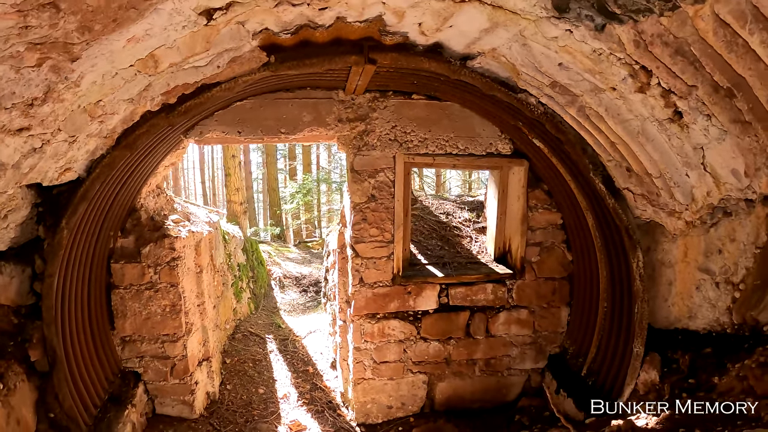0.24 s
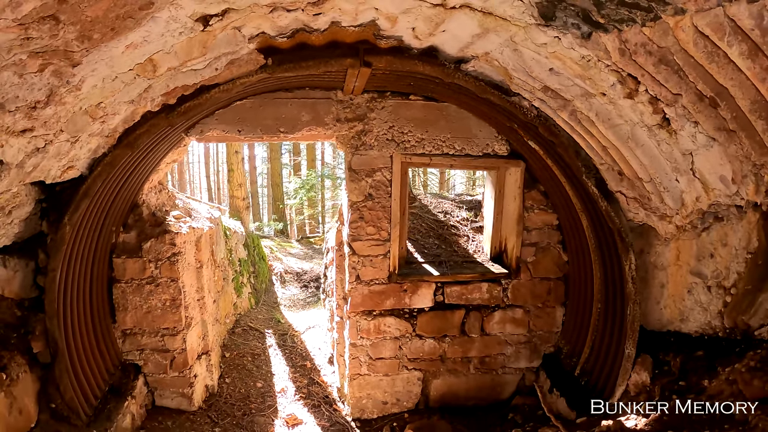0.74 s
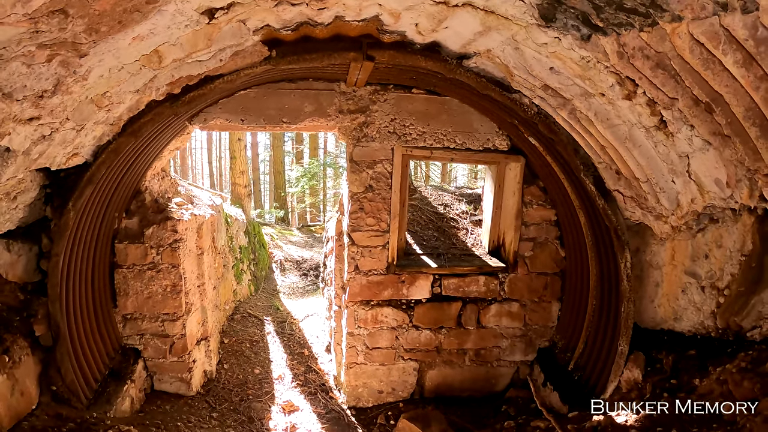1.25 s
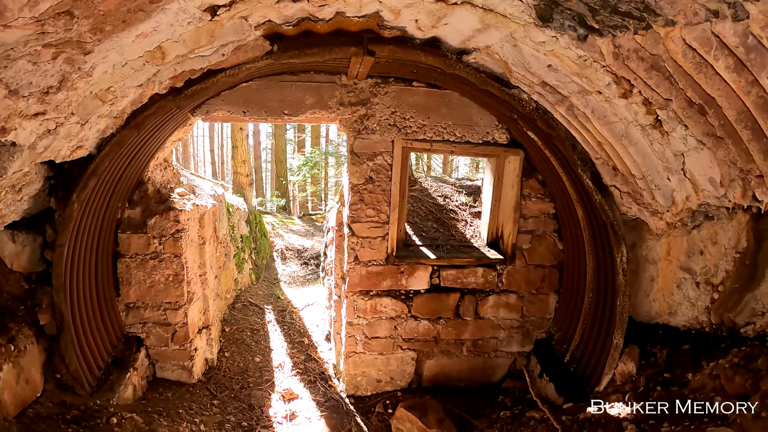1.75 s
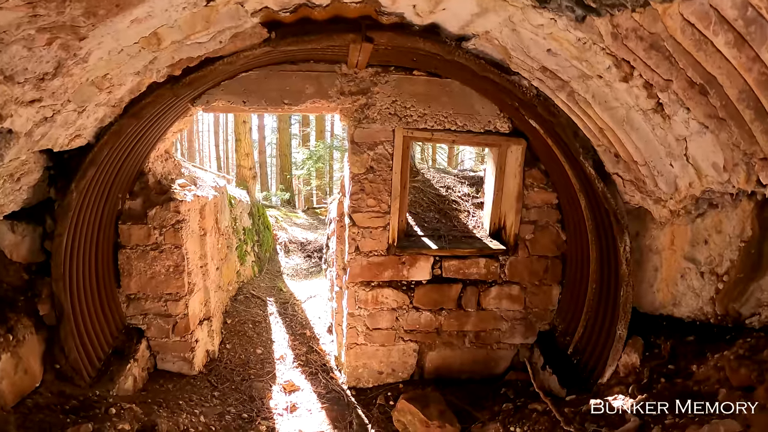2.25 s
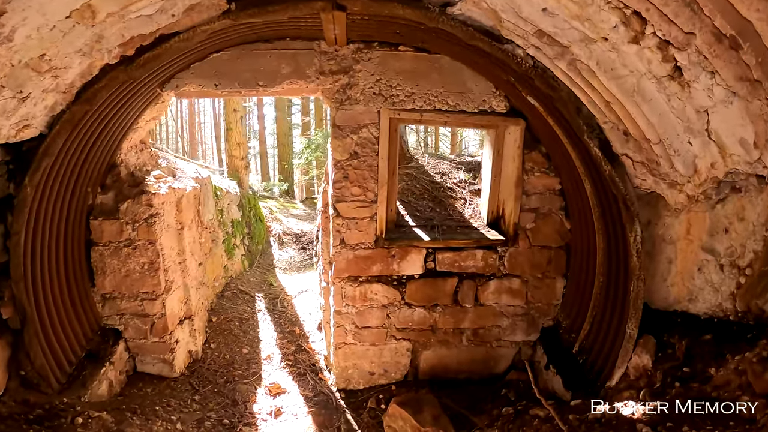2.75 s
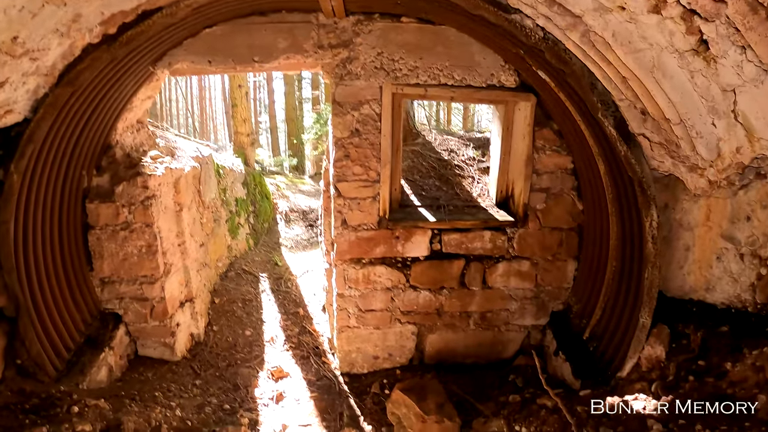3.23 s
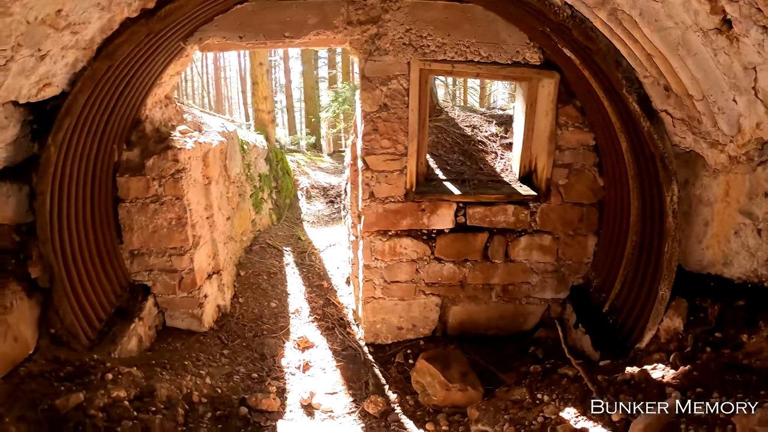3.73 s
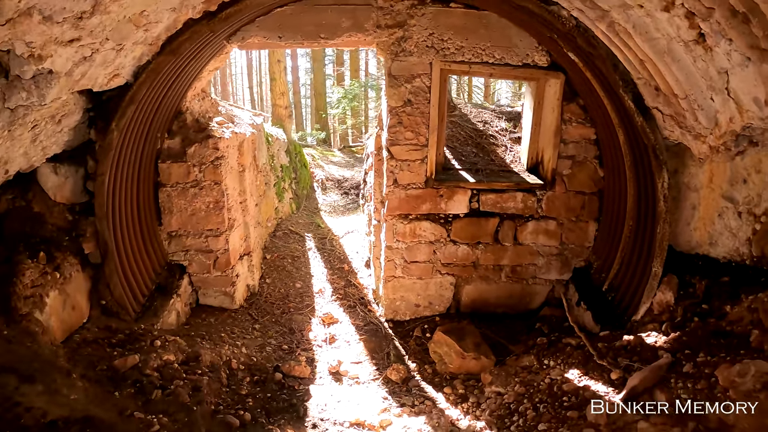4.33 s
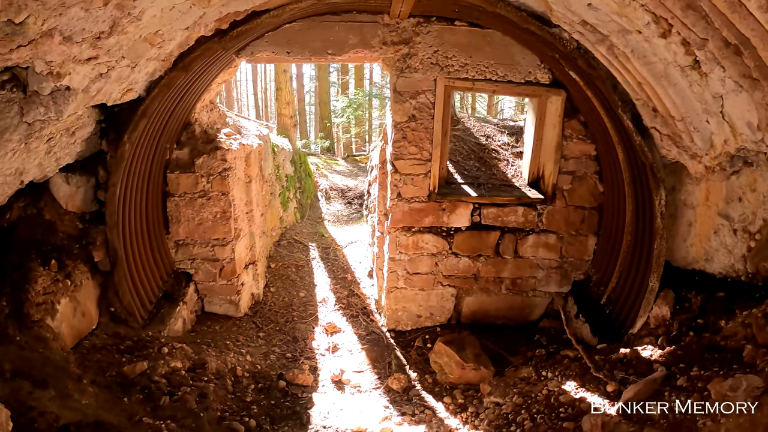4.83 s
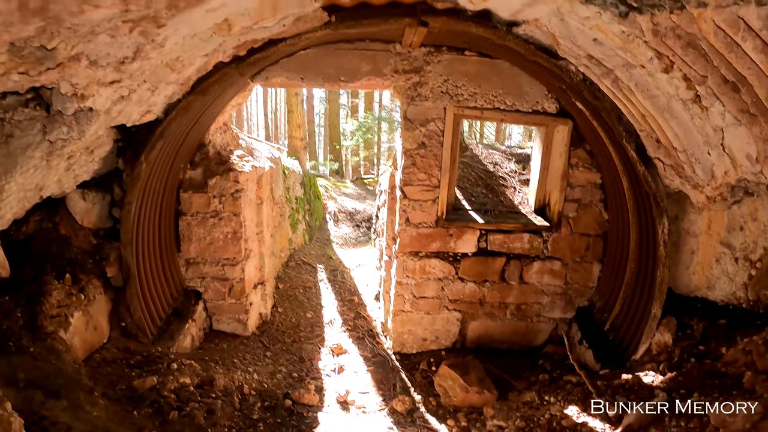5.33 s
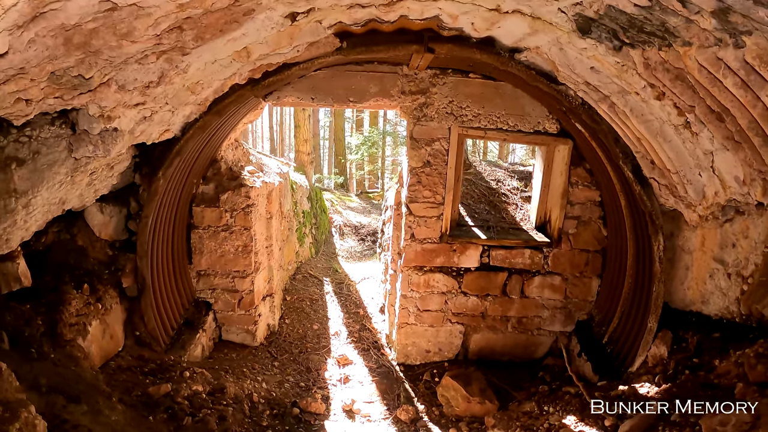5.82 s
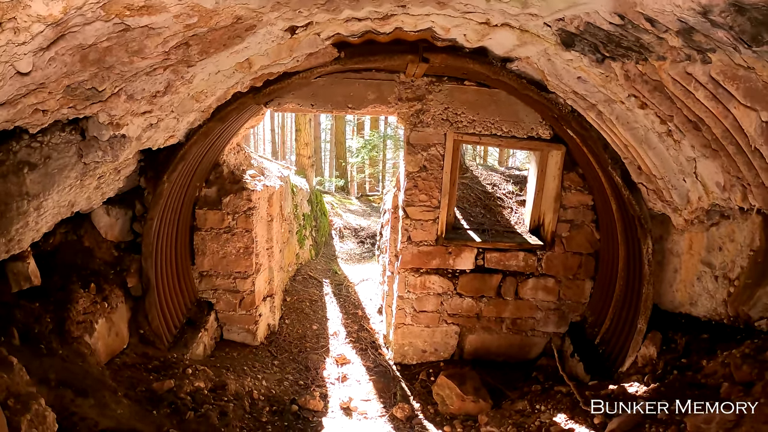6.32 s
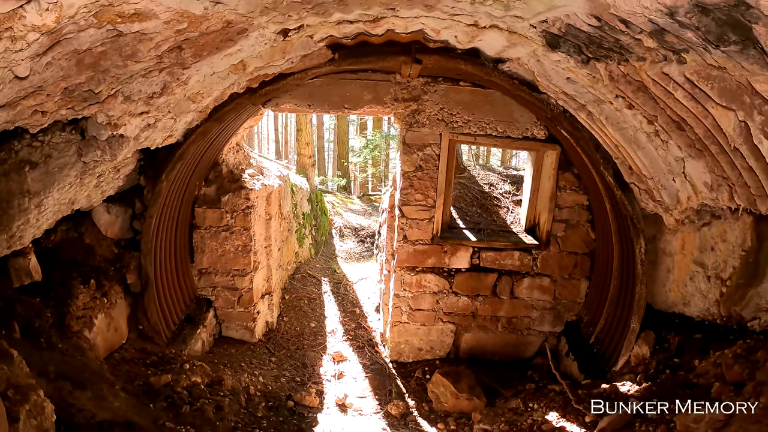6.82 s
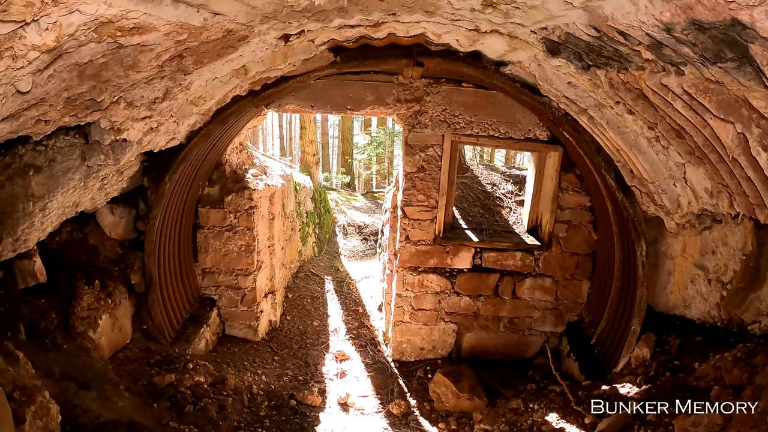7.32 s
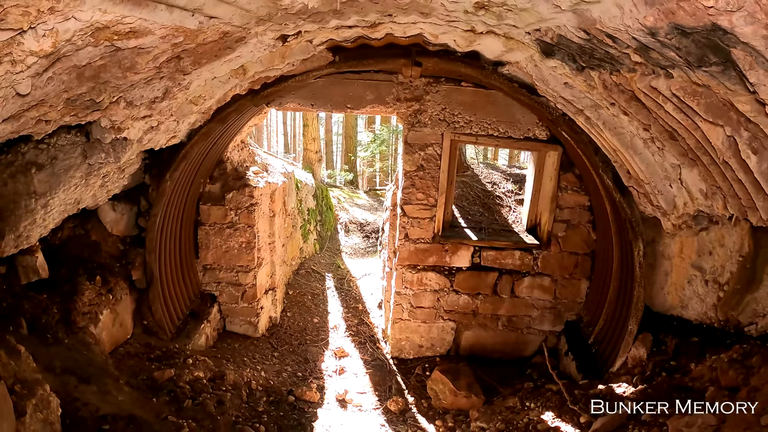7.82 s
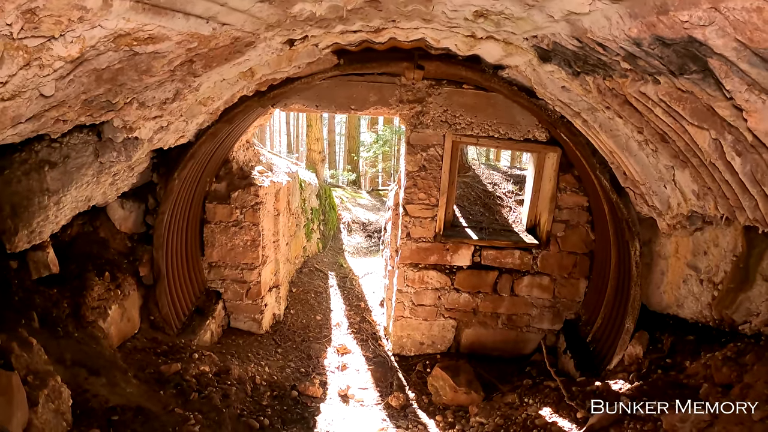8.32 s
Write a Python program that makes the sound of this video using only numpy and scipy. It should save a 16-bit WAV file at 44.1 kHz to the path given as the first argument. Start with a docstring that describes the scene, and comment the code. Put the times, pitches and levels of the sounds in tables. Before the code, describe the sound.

Inside a low concrete vault, a person steps over loose rubble close to the microphone. Light stone clicks and fine grit come first, then a near-quiet pause. Loud clacks and gravel crunches burst out for about a second and a half, followed by a rough stuttering slab scrape and scattered knocks. It thins into small ticks and grit, over a faint steady hiss with a short hollow tail.

```python
"""A light clack of stone over fine shifting grit opens the scene: someone picks a way over loose rubble
inside a low concrete vault, close to a mono microphone. Stones clack as short resonant pushes, gravel
crunches as swelling swarms of contacts, a slab judders in stick-slip jerks, chips ring on one mode,
heels thud on earth, and grit and clothing rustle as filtered random ticks under each stride.
The vault adds bass resonances and a short noise tail; a faint steady hiss lies underneath."""
import sys
import numpy as np
from scipy import signal
from scipy.fft import rfft, irfft, next_fast_len
from scipy.io import wavfile
from scipy.ndimage import map_coordinates

SR = 44100
rng = np.random.default_rng(int(sys.argv[2]) if len(sys.argv) > 2 else 0)


def master_out(mix):
    """Clip the mix to full scale and print it as 16-bit PCM to the path in sys.argv[1]."""
    frames = np.transpose(np.atleast_2d(mix))
    ceiling = np.clip(frames, -1, 1)
    pcm = np.round(ceiling * 32767).astype(np.int16)
    wavfile.write(sys.argv[1], SR, pcm)


N = 377483
TIME = np.arange(N) / SR

# stone striking stone: (time [s], relative level [dB], pitch [Hz], crack against the body [dB], capped at 0)
STONE_CLACKS = [(0.061, -30.5, 2730, 0), (0.276, -30, 2260, -35), (0.354, -23, 2100, -40),
                (0.436, -29, 2860, -36), (0.484, -31, 3170, -35), (0.532, -29, 1420, -34),
                (0.655, -36.5, 1950, -38), (0.792, -43.5, 1290, -34), (1.085, -40, 1670, -7),
                (1.227, -36, 3040, -11), (1.347, -40.5, 1029, -24), (1.506, -42, 1120, -23),
                (2.258, -6.5, 1320, -43), (2.277, -6.5, 2340, -22), (2.381, -20, 1920, -29),
                (2.468, -8, 2130, -44), (2.499, -11.5, 2840, -17), (2.524, -8, 1370, -30),
                (2.557, -23, 4620, -30.5), (2.605, -10, 1270, -32), (2.613, -4.5, 1410, -13),
                (2.844, -18, 1600, -32), (2.923, -16.5, 1610, -35), (3.075, -5.5, 1880, -41),
                (3.162, -18, 3020, -30), (3.2414, -5.5, 2970, -28), (3.482, -8, 2250, -51),
                (3.819, -22, 880, -20), (3.91, -7, 2380, -8.5), (4.427, -28, 835, -30),
                (4.511, -22, 1150, -27), (4.61, -15, 1690, 5.5), (4.793, -28, 2920, -10),
                (5.034, -31.5, 880, -25), (5.217, -30, 3700, -23), (5.275, -35, 2530, -28),
                (5.373, -35, 2700, 0), (5.555, -33.5, 5400, -19), (5.605, -31.5, 507, -7),
                (5.673, -28.5, 3140, -50), (5.922, -22, 3300, -39), (6.003, -27, 1130, -32),
                (6.373, -20, 2190, -1), (6.989, -35.5, 5330, -24.5), (7.196, -40.5, 3100, -17.5),
                (7.585, -38, 2660, -30), (7.6, -39, 3130, -35), (7.668, -42, 1090, -18),
                (7.704, -30.5, 2040, -30.5), (7.746, -43, 4530, -20), (7.817, -34, 4830, -18),
                (8.013, -36, 3020, -38), (8.034, -28, 2450, -37), (8.053, -29, 2830, -42),
                (8.094, -31, 2500, -38), (8.175, -30.5, 1220, -15), (8.183, -24, 2080, -35),
                (8.238, -23, 2230, -41)]
# modes of a loose stone: (frequency over its pitch [ratio])
STONE_MODES = [0.623, 1.0, 1.49]
# weight crushing gravel: (time of crest [s], relative level [dB], rise over 20 dB [s], fall over 20 dB [s],
# pitch of the stones [Hz])
GRAVEL_CRUNCHES = [(0.278, -44.5, 0.023, 0.22, 2160), (0.401, -35, 0.02, 0.095, 760),
                   (.437, -35.5, 0.04, 0.024, 2800), (2.001, -42.5, 0.3, 0.19, 2640),
                   (2.243, -22, 0.078, 0.066, 1830), (2.477, -27.5, 0.011, 0.11, 2130),
                   (2.626, -13, 0.017, 0.029, 1630), (2.687, -20, 0.045, 0.085, 1790),
                   (2.736, -26, 0.035, 0.016, 4720), (2.851, -29, 0.1, 0.18, 1750),
                   (3.03, -28, 0.081, 0.041, 3840), (3.175, -30, 0.051, 0.25, 1740),
                   (3.254, -21.5, 0.068, 0.19, 2820), (3.303, -18.5, 0.059, 0.059, 1810),
                   (3.848, -29, 0.039, 0.027, 2550), (3.99, -32, 0.15, 0.21, 1460),
                   (4.611, -27.5, 0.016, 0.032, 4600), (4.73, -38.5, 0.067, 0.021, 2944),
                   (5.28, -39, 0.084, 0.07, 3600), (5.379, -39, 0.0057, 0.041, 1220),
                   (5.664, -45, 0.12, 0.11, 3040), (5.93, -32.5, 0.021, 0.0075, 3020),
                   (6.012, -39, 0.03, 0.059, 1815), (8.09, -44.5, 0.11, 0.063, 2720),
                   (8.252, -37, 0.019, 0.0089, 900)]
# spectral tilt of the gravel: (frequency [Hz], gain [dB])
GRAVEL_COLOUR = [(80, -21.5), (200, 5.5), (380, 7.5), (700, 0), (1300, -2), (2400, -2), (4000, -3.5),
                 (5800, -12), (7800, -18), (10400, -20), (15000, -22)]
# jerks of the dragged slab: (time [s], length [s], slip rate [1/s], relative level [dB], fade [dB/s])
SLAB_JERKS = [(3.919, .02, 80, -12, 107), (3.9538, .05, 102, -14, 4), (4.0113, .048, 97, -12.5, 5),
              (4.0744, .025, 59, -10.5, 89), (4.121, .058, 60, -9.5, 27), (4.193, .025, 76, -12, 243),
              (4.24, .16, 64, -11.5, 148)]
# ringing modes of the slab: (frequency [Hz], relative level [dB], t60 [s])
SLAB_MODES = [(1150, -21, 0.041), (2187, 3.5, 0.012), (2360, -4.5, 0.012), (3180, -5.5, 0.01),
              (3436, -3, 0.012), (4330, 0.5, 0.0047)]
# heels on packed earth: (time [s], relative knock peak [dB], relative boom peak [dB])
HEEL_THUDS = [(0.4, -27, -69), (0.438, -29.5, -62), (0.496, -57, -34.5), (0.518, -38.5, -46),
              (1.382, -48.5, -51), (1.418, -46, -47.5), (1.509, -42.5, -46), (2.246, -45, -38.5),
              (2.619, -15, -34), (2.687, -36, -32), (3.294, -17.5, -37), (4.86, -45, -54),
              (5.033, -36, -55), (5.605, -42, -49), (7.87, -71, -50), (8.244, -40.5, -70),
              (8.429, -46.5, -51)]
# thin chips that ring: (time [s], relative peak [dB], pitch [Hz])
CHIP_CLINKS = [(0.396, -24, 3430), (0.425, -26.5, 3540), (0.437, -20.5, 3250), (0.493, -33, 3590),
               (2.236, -15, 3760), (3.758, -34, 4160), (5.375, -28, 3400)]
# weight on a foot: (time [s], time under load [s], relative grit level [dB], relative rubbing level [dB])
FOOT_LOADS = [(0, 0.025, -45, -61.5), (0.201, 0.27, -44, -58.5), (1.5, 0.75, -55.5, -69.5),
              (2.194, 0.22, -35, -52), (3.024, 0.25, -34.5, -42.5), (3.43, 0.078, -36, -56),
              (3.869, 0.57, -36.5, -48.5), (4.419, 0.3, -39.5, -47), (5.073, 0.36, -41, -60.5),
              (5.93, 0.13, -44, -61), (6.269, 0.15, -48.5, -57.5), (6.52, 0.24, -55, -64),
              (7.429, 0.29, -54.5, -66), (8.03, 0.31, -62.5, -77)]
# spectral tilt of rubbing cloth and soles: (frequency [Hz], gain [dB])
CLOTH_COLOUR = [(40, -35), (110, -17.5), (190, -6.5), (270, -5), (330, -2), (450, -15), (1000, -30),
                (2500, -43.5)]
# nearby rock face heard from each footing: (from time [s], detour of the reflection [m])
ROCK_DETOURS = [(0, .785), (1.7, 0.66), (2.44, 0.74), (2.593, 0.87), (3.7, 0.94), (4.4, .847),
                (4.972, 0.72), (5.52, 0.62), (6.9, 0.47)]
# low resonances of the vault: (frequency [Hz], width [Hz], gain [dB])
VAULT_HOLLOW = [(118.7, 11, -6), (344, 33, -10)]
# decay of the vault's tail: (frequency [Hz], t60 [s])
VAULT_DECAY = [(150, 0.52), (1000, 0.14), (4000, 0.3), (10000, 0.31)]
# spectral tilt of the hiss: (frequency [Hz], gain [dB])
HISS_COLOUR = [(25, -2.5), (100, 1), (300, -1.5), (700, -21), (2000, -5), (4500, -10.5), (8000, -18.5),
               (12000, -20.5), (15000, -31)]
# the microphone's port, with a narrow null in the treble: (frequency [Hz], gain [dB])
PORT_COLOUR = [(7600, 1.5), (8700, -6.5), (9050, -27), (9400, -6), (10400, 0), (11500, -10.5),
               (15000, -10.5)]

# a foot's load builds (time for 20 dB), eases as the ground packs, then lifts
LOAD_S, SAG_DB_PER_S, LIFT_DB_PER_S = 0.1, 3, 81.5
TRICKLE_DB, TRICKLE_DB_PER_S = -4, 28.5  # grit keeps running after the foot has gone
SETTLE_DB, MURMUR_DB = -65.5, -87.5  # floors: grit and clothes are never quite still
SLIP_SCATTER_S, SLIP_SCATTER_DB = 0.00055, 1.5
SOUND_M_PER_S = 343
TOP_LEVEL, TOP_HZ = 0.58, 15300  # ceiling of the rounded peaks, band limit


def clacks(level_db=15, scatter_db=-27.0, scatter_t60=0.092, scatter_rise=0.0015,
           breadth=1.0, ground_db=-25, ring_db=-4, ring_width=0.12):
    """A stone pushes for a cycle or two, rings and cracks; chips and neighbours rattle in separate ticks."""
    out, t = np.zeros(N), np.arange(-SR // 400, SR // 6) / SR
    after = np.maximum(t, 0)
    rattle = amp(scatter_db - 60 * after / scatter_t60) * (1 - np.exp(-after / scatter_rise))
    for s, db, pitch, crack_db in STONE_CLACKS:
        force = (t == 0) + rattle * ticks(len(t), rate=1200, spread_db=3)
        modes = pitch * np.array(STONE_MODES) * rng.normal(1, .05, len(STONE_MODES))

        def stone(hz):
            push = band(hz, pitch, breadth * pitch) ** 2
            ground = amp(ground_db) * band(hz, 500, 500)
            ring = amp(ring_db) * sum(band(hz, c, ring_width * c) for c in modes)
            return (push + ground + ring) / (1 + (hz / (1.9 * pitch)) ** 6)

        body = unit(filtered(force, stone))
        crack = unit(filtered(force, lambda hz: band(hz, 4200, 7900) ** 3 / (1 + (hz / 9500) ** 4)))
        hit = reflected(body + amp(min(crack_db, 0)) * crack, s, gain=1.15, spread=.1)
        add(out, s + t[0], amp(db + level_db) * hit / np.linalg.norm(hit))
    return out


def crunches(level_db=-0.5, breadth=2, pebble_db=-4, full_rate=5000, crowding=0.61, clump_db=1.5):
    """A footfall sets off a swell of contacts, the denser the heavier, that dies as the gravel packs."""
    out, t = np.zeros(N), np.arange(-SR // 4, SR // 4) / SR
    for s, db, rise, fall, pitch in GRAVEL_CRUNCHES:
        swell = amp(-20 * np.where(t < 0, -t / rise, t / fall))
        crushed = grains(len(t), rate=full_rate * amp(crowding * db), spread_db=0.5)
        crushed = unit(filtered(crushed, lambda hz: band(hz, pitch, breadth * pitch)))
        crunch = swell * (crushed + amp(pebble_db) * pebbles(len(t), pitch))
        crunch = reflected(crunch, s, gain=0.5, spread=0.011, rough_hz=3300)
        add(out, s + t[0], amp(db + level_db) * crunch)
    return out * amp(clump_db * wobble(160))


def slab(level_db=15.5, scratch_db=-17, scratch_t60=0.094, dull_hz=7500):
    """Every slip rings the same slab for an instant and scratches its face."""
    out, t = np.zeros(N), np.arange(SR // 20) / SR
    onset = 1 - np.exp(-t / 0.00096)
    for s, db in slips():
        ring = np.zeros(len(t))
        for hz, mode_db, t60 in SLAB_MODES:
            varied_db = mode_db + rng.normal(0, 1)
            ring += amp(varied_db - 60 * t / t60) * np.sin(2 * np.pi * hz * t)
        scratch = unit(filtered(rng.standard_normal(len(t)), lambda hz: band(hz, 1940, 5800) ** 2))
        scratch = scratch * amp(scratch_db - 60 * t / scratch_t60)
        hit = reflected((ring + scratch) * onset, s, gain=2.4, spread=.07)
        add(out, s, amp(db + level_db) * hit / np.linalg.norm(hit))
    return filtered(out, lambda hz: 1 / np.sqrt(1 + (hz / dull_hz) ** 6))


def slips(count=16):
    """Rows (time [s], relative level [dB]): each jerk lets go at a nearly even rate and fades."""
    rows = []
    for s, length, rate, db, fade in SLAB_JERKS:
        for k, (late, strong) in enumerate(rng.standard_normal((count, 2))):
            since = k / rate
            if since < length:
                rows.append((s + since + SLIP_SCATTER_S * late, db - fade * since + SLIP_SCATTER_DB * strong))
    return rows


def thuds(knock_db=-3, boom_db=0, knock_t60=0.088, boom_t60=0.11, knock_hz=320, boom_hz=112, crumble_db=-19):
    """A heel's push gives a dull knock and a longer boom of the earth, each with soil crumbling after."""
    out, t = np.zeros(N), np.arange(SR // 4) / SR
    for s, heel_db, earth_db in HEEL_THUDS:
        knock = heel_db + knock_db, knock_hz, knock_t60
        boom = earth_db + boom_db, boom_hz, boom_t60
        for db, pitch, t60 in (knock, boom):
            force = (t == 0) + rng.standard_normal(len(t)) * amp(crumble_db - 60 * t / t60)
            push = filtered(force, lambda hz: band(hz, pitch, .8 * pitch) ** 2)
            add(out, s, amp(db) * push / np.abs(push).max())
    return out


def clinks(ring_t60=0.023, chatter_db=-20, chatter_t60=0.02):
    """A thin chip tips over and chatters briefly on its one clear mode."""
    out, t = np.zeros(N), np.arange(SR // 12) / SR
    for s, db, pitch in CHIP_CLINKS:
        force = (t == 0) + rng.standard_normal(len(t)) * amp(chatter_db - 60 * t / chatter_t60)
        mode = np.sin(2 * np.pi * pitch * t) * amp(-60 * t / ring_t60)
        ring = signal.fftconvolve(force, mode)[:len(t)]
        add(out, s, amp(db) * ring / np.abs(ring).max())
    return out


def grit(level_db, big_db=-8, small_db=-3.5, sand_db=-17, usual_db=-40, clump_db=3.5):
    """Each size of grit shifts in its own clumps; a harder push moves bigger stones, relatively less sand."""
    heavy_db = level_db - usual_db
    loose = grains(N, rate=950, spread_db=0.5)
    big = unit(filtered(loose, lambda hz: band(hz, 997, 1800) ** 2))
    big = big * amp(big_db + heavy_db + clump_db * wobble(60))
    small = unit(filtered(loose, lambda hz: band(hz, 2675, 6770) ** 2))
    small = small * amp(small_db + clump_db * wobble(110))
    sand = unit(filtered(loose, lambda hz: band(hz, 6020, 9700) ** 2))
    sand = sand * amp(sand_db - heavy_db / 2 + 2.3 * wobble(38))
    strays = amp(-11) * pebbles(N, 2700, rate=70)
    return amp(level_db) * (big + small + sand + strays)


def rubbing(cloth_db, flutter_db=4.5):
    """Cloth and soles rub with a low, uneven rustle of tiny ticks."""
    rustle = unit(coloured(ticks(N, rate=2000, spread_db=7.5), CLOTH_COLOUR))
    return amp(cloth_db + flutter_db * wobble(40)) * rustle


def stride_levels():
    """Grit and rubbing levels [dB]: each stride builds, sags and lifts by one rule; grit trickles on."""
    grit_power, rub_power = amp(SETTLE_DB) ** 2, amp(MURMUR_DB) ** 2
    for s, hold, grit_db, rub_db in FOOT_LOADS:
        before, after = np.maximum(s - TIME, 0), np.maximum(TIME - s - hold, 0)
        load_db = -20 * before / LOAD_S - SAG_DB_PER_S * np.clip(TIME - s, 0, hold)
        lift_db = -LIFT_DB_PER_S * after
        trickle_db = np.maximum(lift_db, TRICKLE_DB - TRICKLE_DB_PER_S * after)
        grit_power = grit_power + amp(grit_db + load_db + trickle_db) ** 2
        rub_power = rub_power + amp(rub_db + load_db + lift_db) ** 2
    return 10 * np.log10(grit_power), 10 * np.log10(rub_power)


def reflected(x, s, gain, spread, rough_hz=9000):
    """A contact arrives directly and off nearby rock; its rough face scatters treble out of the echo."""
    since, detour = np.transpose(ROCK_DETOURS)
    footing = max(np.searchsorted(since, s) - 1, 0)
    lag = detour[footing] * rng.uniform(1 - spread, 1 + spread) / SOUND_M_PER_S

    def two_paths(hz):
        share = gain / (1 + (hz / rough_hz) ** 4)
        return (1 + share * np.exp(-2j * np.pi * hz * lag)) / np.hypot(1, share)

    return filtered(x, two_paths)


def vault(x, tail_db=-11):
    """The arch rings hollow in the bass and returns a short, dense tail."""
    hz, t, z = signal.stft(rng.standard_normal(SR // 2), SR, nperseg=256)
    decay = amp(-60 * t / along(VAULT_DECAY, hz)[:, None])
    tail = signal.istft(z * decay, SR, nperseg=256)[1]
    tail = np.pad(tail / np.linalg.norm(tail), (SR // 150, 0))  # delay before the tail
    hollow = filtered(x, lambda f: sum(amp(db) * band(f, c, w) for c, w, db in VAULT_HOLLOW))
    return x + hollow + amp(tail_db) * signal.fftconvolve(x, tail)[:N]


def hiss(level_db=-65):
    """A faint, steady hiss of coloured noise."""
    return amp(level_db) * unit(coloured(rng.standard_normal(N), HISS_COLOUR))


def grains(n, rate, spread_db, count=7):
    """Pebbles of several sizes, each size ticking at its own pitch."""
    out = np.zeros(n)
    for c in np.geomspace(400, 9000, count):
        out += filtered(ticks(n, rate, spread_db), lambda hz: band(hz, c, c / 2))
    return coloured(out, GRAVEL_COLOUR)


def pebbles(n, pitch, rate=170, variety=0.398):
    """Single pebbles click at random moments, each for a few cycles at a pitch of its own; rms 1."""
    out, t = np.zeros(n), np.arange(SR // 50) / SR
    draws = np.clip(rng.standard_normal((n // 20, 2))[:int(rate * n / SR)], -2, 2)
    for s, (size, strength) in zip(rng.uniform(0, n / SR, n // 20), draws):
        turns = min(pitch * np.exp(variety * size), SR / 6) * t  # cycles so far
        fade = amp(5 * strength - 4 * turns) * (1 - np.exp(-turns))
        add(out, s, fade * np.sin(2 * np.pi * turns))
    return unit(out)


def ticks(n, rate, spread_db):
    """n samples of random tiny contacts of unequal size, rms 1."""
    size = amp(spread_db * np.clip(rng.standard_normal(n), -2, 2))
    return unit((rng.random(n) < rate / SR) * size * rng.choice([-1, 1], n))


def wobble(rate):
    """A smooth random curve through clipped knots, rate knots a second."""
    knots = np.clip(rng.standard_normal(N // 10), -2, 1.2)
    return map_coordinates(knots, [TIME * rate])


def band(hz, centre, width):
    """Response of one resonance."""
    return 1j * hz * width / (centre ** 2 - hz ** 2 + 1j * hz * width)


def filtered(x, response):
    """Shape x by a complex response of frequency."""
    m = next_fast_len(len(x) + SR // 10)
    return irfft(rfft(x, m) * response(np.fft.rfftfreq(m, 1 / SR)), m)[:len(x)]


def coloured(x, points, size=2048):
    """Causal minimum-phase filter with the gain of (frequency [Hz], gain [dB]) points."""
    gain = amp(along(points, np.fft.rfftfreq(size, 1 / SR)))
    cepstrum = irfft(np.log(gain + 1e-6))
    cepstrum[1:size // 2] *= 2  # fold the cepstrum onto positive time
    cepstrum[size // 2 + 1:] = 0
    return signal.fftconvolve(x, irfft(np.exp(rfft(cepstrum))))[:len(x)]


def along(points, hz):
    """Interpolate (frequency [Hz], value) points on a log frequency axis."""
    f, v = np.transpose(points)
    return np.interp(np.log(hz + 1), np.log(f + 1), v)


def add(track, s, sound):
    """Mix a sound into the track from time s."""
    part = track[max(round(s * SR), 0):][:len(sound)]
    part += sound[:len(part)]


def amp(db):
    """Decibels to amplitude."""
    return 10 ** (np.asarray(db) / 20)


def unit(x):
    """Scale to rms 1."""
    return x / np.sqrt(np.mean(x ** 2) + 1e-20)


def scene(steps_db=-1.52):
    """The steps in the vault over a faint, steady hiss; both channels are alike."""
    grit_db, cloth_db = stride_levels()
    impacts = clacks() + crunches() + slab() + thuds() + clinks()
    steps = vault(impacts + grit(grit_db) + rubbing(cloth_db))
    mono = amp(steps_db) * steps + hiss()
    return np.array([mono, mono])


def record(dry):
    """The loudest peaks round off, the microphone's port colours the treble, the band limit cuts the top."""
    rounded = dry / (1 + np.abs(dry / TOP_LEVEL) ** 4) ** (1 / 4)
    return np.array([filtered(coloured(x, PORT_COLOUR), lambda hz: hz < TOP_HZ) for x in rounded])


dry = scene()
out = record(dry)
master_out(out)
```